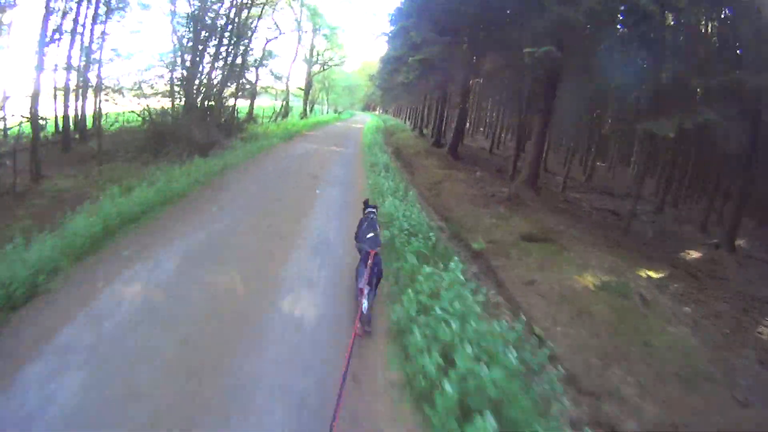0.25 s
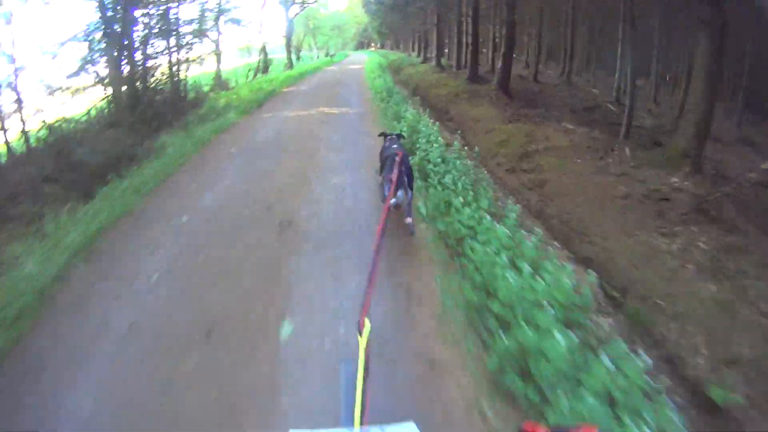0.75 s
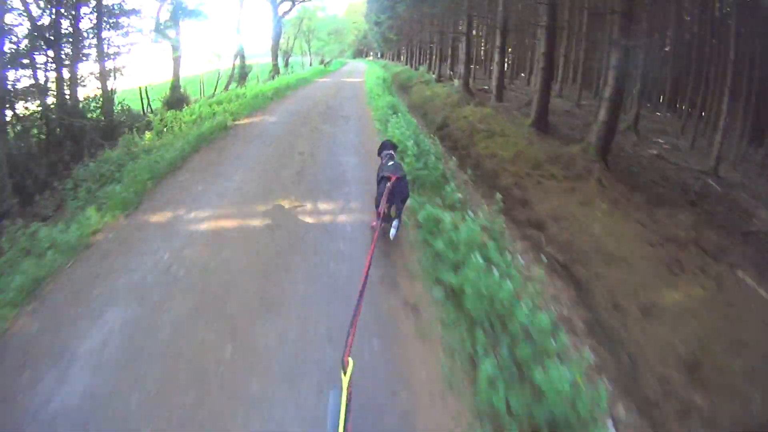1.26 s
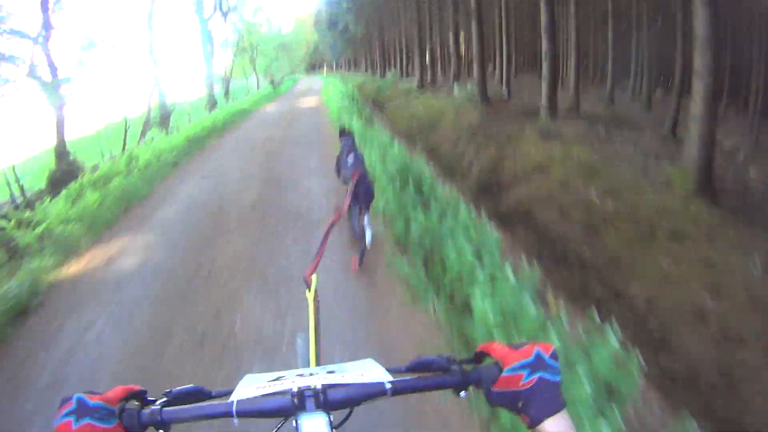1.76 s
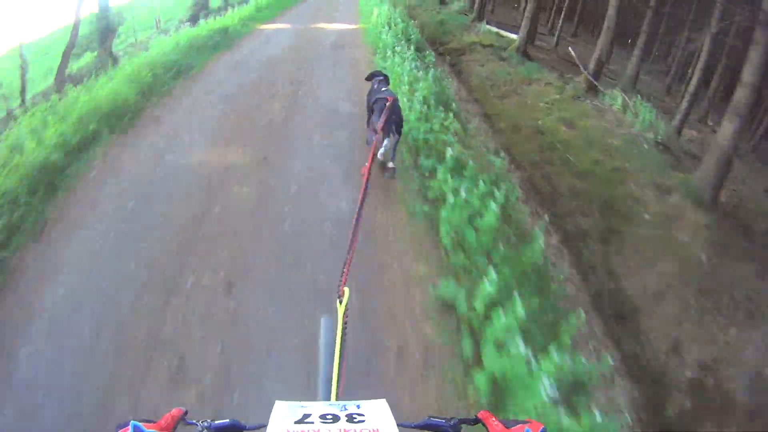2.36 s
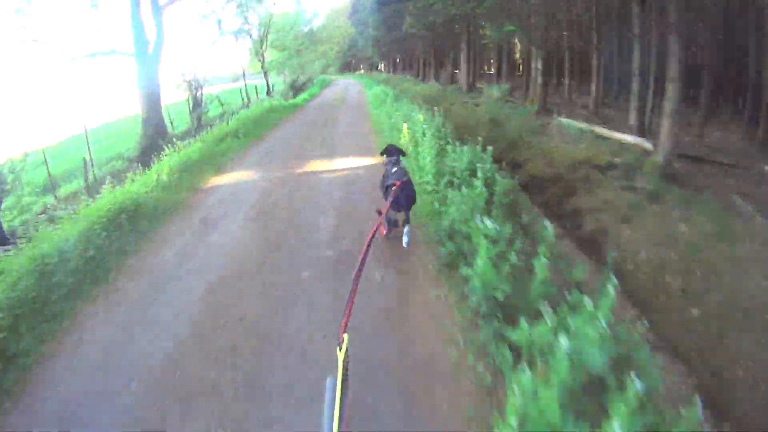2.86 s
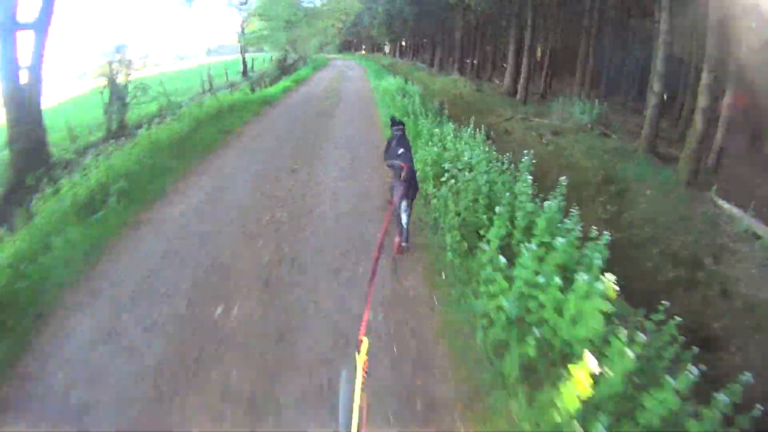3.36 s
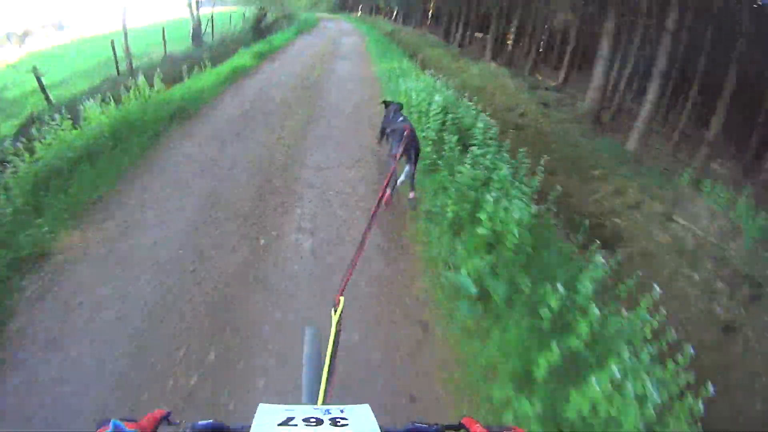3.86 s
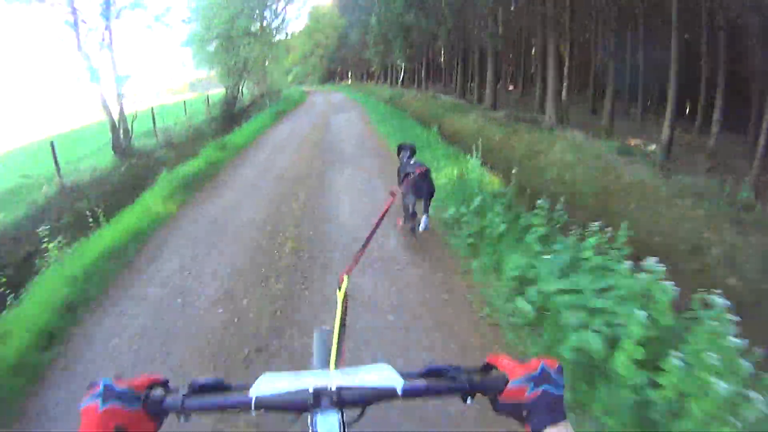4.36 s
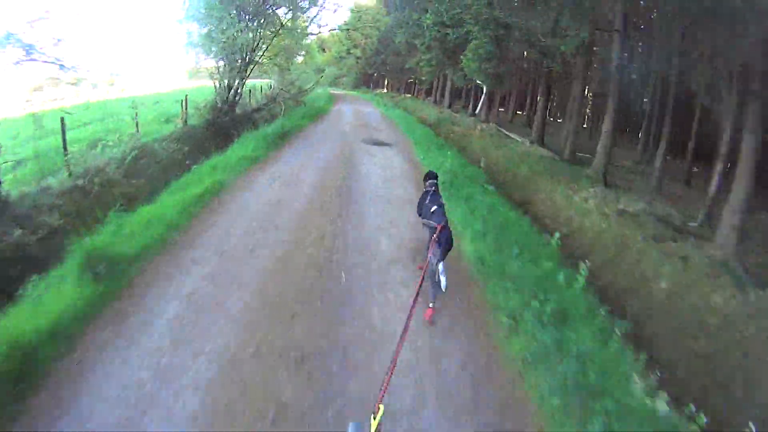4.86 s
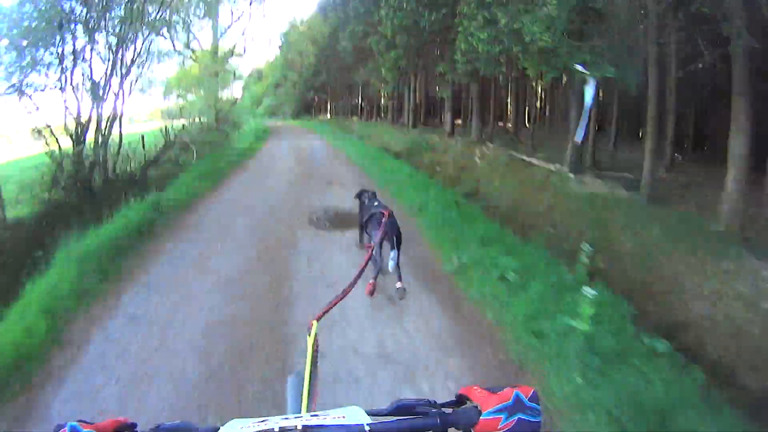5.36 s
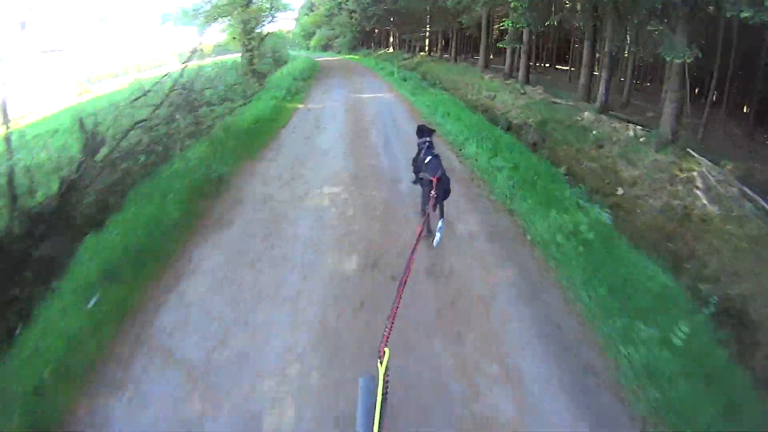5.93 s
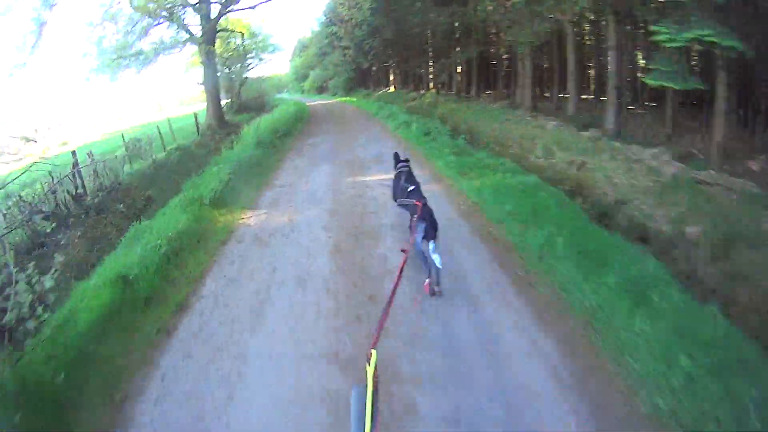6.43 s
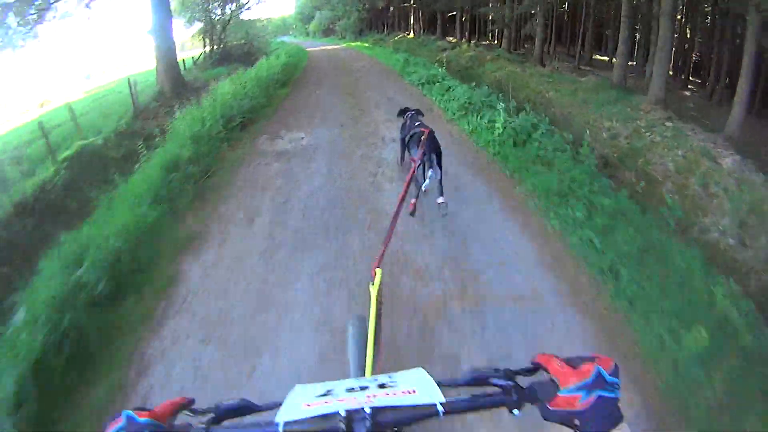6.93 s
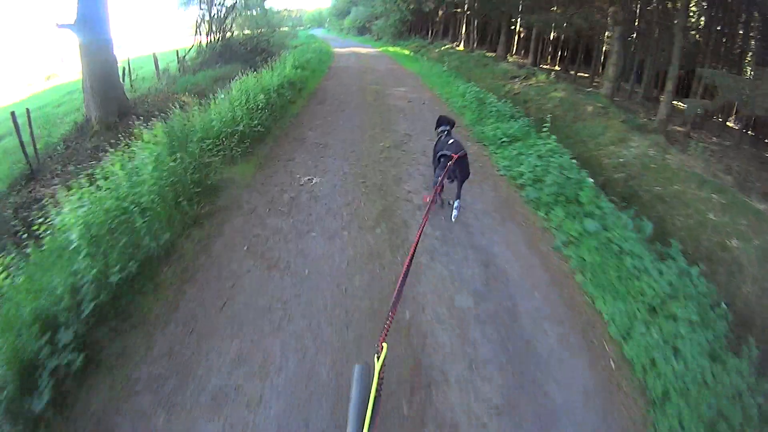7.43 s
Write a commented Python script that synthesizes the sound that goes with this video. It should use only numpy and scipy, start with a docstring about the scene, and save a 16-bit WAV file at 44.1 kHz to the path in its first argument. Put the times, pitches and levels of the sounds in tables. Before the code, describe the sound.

A fast scooter rolls on loose stones, its continuous gritty crunch broken by regular rattling thuds and short scuffs from kicking.

```python
"""Gravel crunches under a fast kick scooter, heard from a small camera in a closed case strapped to the rider.
Random clicks for the stones ring the hollow resonances of the case; the foot's scuffs are gated bursts of such clicks.
Around each kick the case thumps (damped swings), clacks on its mount (noise ringing its shell) and sways
(low noise through chest resonances), and the frame rumbles. Two faint wavering calls lie far off, under mild hiss."""
import sys
import numpy as np
from scipy import signal
from scipy.io import wavfile

SR = 44100
rng = np.random.default_rng(int(sys.argv[2]) if len(sys.argv) > 2 else 0)


def inscribe(sig):
    """Save sig as 16-bit PCM at rate SR to the path in sys.argv[1].

    A 1-D sig is mono; a 2-D sig holds one channel per row.
    Samples are clipped to [-1, 1] before scaling.
    """
    pcm = np.round(np.clip(np.atleast_2d(sig).T, -1, 1) * 32767)
    wavfile.write(sys.argv[1], SR, pcm.astype(np.int16))


N = 339129

# Air resonances in the case. Each row: pitch in Hz, width in Hz, relative gain in dB of the part
# alike in both microphones, relative gain in dB of the opposed part.
CASE_MODES = [(612, 150, -17.5, -25), (821, 60, -6.5, -10), (1293, 258, -1, -5.5), (1452, 185, 4.5, -17.5),
              (1704, 153, 4.5, -10), (2030, 270, -25, -12.5), (2490, 130, -16, -9.5),
              (3090, 800, -18, -17.5), (4060, 1700, -52, -25), (4833, 320, -21.5, -25.5),
              (5415, 220, -22, -36.5), (7840, 1200, -40.5, -53)]


def from_db(db):
    """Gain of a level in dB."""
    return 10 ** (np.asarray(db) / 20)


def rms_one(x):
    """Scaled to rms 1."""
    return x / np.sqrt(np.mean(x ** 2) + 1e-20)


def peak_one(x):
    """Scaled so that the mean of the channels peaks at 1."""
    return x / np.abs(x.mean(axis=0)).max()


def in_time(rows):
    """Each column of a curve, interpolated to every sample."""
    s, *columns = np.transpose(rows)
    return [np.interp(np.arange(N) / SR, s, c) for c in columns]


def drift(rate_hz):
    """Slow random curve of spread near 1: straight lines between 2 * rate_hz random knots per second."""
    knots = rng.standard_normal(int(N / SR * rate_hz * 2) + 2)
    curve = np.interp(np.arange(N), np.linspace(0, N, len(knots)), knots)
    return curve * np.sqrt(1.5)     # interpolation narrows the spread


def band(x, low_hz, high_hz):
    """Butterworth band-pass."""
    return signal.sosfilt(signal.butter(2, [low_hz, high_hz], "band", fs=SR, output="sos"), x)


def resonate(mid_side, modes):
    """Parallel resonances with alternating signs; the alike and opposed parts give left and right."""
    out = np.zeros_like(mid_side)
    for k, (hz, width_hz, mid_db, side_db) in enumerate(modes):
        radius = np.exp(-np.pi * width_hz / SR)
        b = (1 - radius ** 2) / 2 * np.array([1, 0, -1])
        a = [1, -2 * radius * np.cos(2 * np.pi * hz / SR), radius ** 2]
        ringing = signal.lfilter(b, a, mid_side + 1e-18)
        out += (-1) ** k * from_db([[mid_db], [side_db]]) * ringing
    mid, side = out
    return np.array([mid + side, mid - side])


def grains(per_s, spread_db):
    """Random clicks of uneven size, two unrelated streams; rms 1."""
    sizes = from_db(spread_db * np.minimum(rng.exponential(1, (2, N)), 5))
    signs = rng.choice([-1, 1], (2, N))
    return rms_one(sizes * signs * (rng.random((2, N)) < per_s / SR))


def panned(x, pan_db):
    """Left and right of a sound, left louder by pan_db."""
    return x * from_db(np.clip(pan_db, -9, 9) * np.array([[.5], [-.5]]))


def add(out, s, x):
    """Mixes x in at s seconds."""
    i = max(round(s * SR), 0)
    out[:, i:i + x.shape[1]] += x[:, :N - i]


def muffled(x):
    """The wall of the case as a low-pass."""
    wall_hz = 8260
    return signal.sosfilt(signal.butter(4, wall_hz, fs=SR, output="sos"), x)


def swell(half_width_s):
    """Power that rises and falls around each push of the foot; half_width_s reaches 1/e."""
    # Each row: time in seconds, force in dB.
    kicks = [(.94, -0.5), (1.8, 4), (2.66, 1), (3.58, 2.5), (4.46, 0.5), (5.33, 1), (6.18, 0), (7.08, 1.5)]
    t = np.arange(N) / SR
    return sum(from_db(2 * force_db) * np.exp(-((t - s) / half_width_s) ** 2) for s, force_db in kicks)


def loaded(rest_db, kick_db, half_width_s):
    """Level in dB of the part between kicks plus the power that kicks add."""
    power = from_db(2 * rest_db) + from_db(2 * kick_db) * swell(half_width_s)
    return 10 * np.log10(power)


def shaking(level_db, modes, lumpy_db, soft_hz):
    """Random bumps shake a body at its modes; soft contact weakens them above soft_hz."""
    bumps = rng.standard_normal((2, N)) * from_db(lumpy_db * drift(20))
    return from_db(level_db) * rms_one(resonate(band(bumps, 7.4, soft_hz), modes))


def call():
    """A faint far call, perhaps a bird: a wavering sine that sags in pitch, fading in and out."""
    # Each row: start in seconds, length in seconds, initial pitch in Hz before waver, level in dB before flutter.
    far_calls = [(2.08, 0.21, 1030, -47), (3.927, 0.24, 1028, -45)]
    edge_s, sag_hz_per_s, flutter_db = 0.028, 58, 3
    t, out, waver = np.arange(N) / SR, 0, 1 + 0.0074 * drift(40)
    for s, length_s, hz, level_db in far_calls:
        envelope = np.clip(np.minimum(t - s, s + length_s - t) / edge_s, 0, 1) ** 2
        pitch_hz = (hz - sag_hz_per_s * np.clip(t - s, 0, length_s)) * waver
        tone = np.sqrt(2) * np.sin(2 * np.pi * np.cumsum(pitch_hz) / SR)
        out = out + from_db(level_db + flutter_db * drift(15)) * envelope * tone
    return out


def sway():
    """Level of the body's sway in dB: a low wandering rest, and a steep rise and fall at each lurch."""
    # Lurches against the harness. Each row: time in seconds, peak level in dB.
    lurches = [(.64, -47), (.77, -35), (.83, -26.5), (.92, -20.5), (.96, -22.5), (1.07, -32), (1.68, -31),
               (1.77, -22), (1.82, -30), (1.93, -34), (2.23, -39), (2.55, -26.5), (2.65, -25), (2.69, -26),
               (2.87, -45), (3.23, -35), (3.36, -30.5), (3.49, -25), (3.55, -29), (3.6, -18), (4.32, -26),
               (4.45, -20), (4.56, -36), (5.18, -34), (5.28, -25), (5.35, -20), (5.41, -28), (6.0, -31),
               (6.12, -27), (6.21, -23), (6.27, -22.5), (6.36, -37), (6.9, -38), (6.985, -27), (7.07, -18),
               (7.14, -29), (7.32, -41), (7.6, -38)]
    rest_db, wander_db, rise_db_per_s, fall_db_per_s = -61, 5, 500, 400
    t = np.arange(N) / SR
    level_db = rest_db + wander_db * drift(7.4)
    for s, peak_db in lurches:
        drop_db = np.maximum(rise_db_per_s * (s - t), fall_db_per_s * (t - s))
        level_db = np.maximum(level_db, peak_db - drop_db)
    return level_db


def chest():
    """Chest and harness resonate at low pitches as the body sways."""
    # Each row: pitch in Hz, width in Hz, relative gain in dB alike, relative gain in dB opposed.
    chest_modes = [(31, 20, 3, -8), (76.3, 24, 4.5, -4), (104.5, 44, 0.5, -3.5)]
    return shaking(sway(), chest_modes, lumpy_db=1.5, soft_hz=134)


def frame():
    """Frame and strap resonate with the rolling, more strongly around kicks."""
    # Each row: pitch in Hz, width in Hz, relative gain in dB alike, relative gain in dB opposed.
    frame_modes = [(28, 35, -3.5, -30), (111.6, 76, -1, -37), (183, 61, -1, -17.5), (296, 46, 0.5, -9),
                   (457, 206, -11, -6.5), (626, 410, -10, -10.5)]
    level_db = loaded(rest_db=-44, kick_db=-36.5, half_width_s=0.11)
    return shaking(level_db, frame_modes, lumpy_db=2.5, soft_hz=970)


def thumps():
    """A blow through the strap is a damped swing with an overtone, its phase unlike in the two microphones."""
    # Each row: time in seconds, relative level in dB, pitch in Hz.
    blows = [(.76, -24, 313), (0.8724, -30.5, 263), (.9092, -16, 252), (0.919, -5, 480), (0.9295, -13, 304),
             (0.9498, -21, 478), (0.9604, -10.5, 242), (.9683, -20, 295), (1.0526, -20, 290),
             (1.083, -27, 440), (1.0872, -25, 630), (1.6654, -27.5, 202), (1.69, -32, 513),
             (1.7253, -24.5, 276), (1.7403, -4, 520), (1.7607, -15, 231), (1.768, -19, 238),
             (1.779, -20, 406), (1.7974, -24, 585), (1.826, -14, 226), (1.8336, -26, 314),
             (1.8539, -18, 536), (1.9036, -22, 258), (1.938, -20, 450), (1.9448, -21.5, 530),
             (2.554, -28.5, 184), (2.5938, -11, 594), (2.6115, -29, 181), (2.6338, -21.5, 320),
             (2.6454, -7.5, 227), (2.7054, -16.5, 318), (2.714, -28, 353), (2.82, -25, 715),
             (2.823, -31.5, 433), (3.2038, -13, 625), (3.3597, -11.5, 333), (3.4883, -11.5, 583),
             (3.514, -24, 276), (3.5473, -10, 557), (3.5758, -11, 252), (3.585, -18.5, 147),
             (3.596, -16, 455), (3.6189, -15, 263), (3.7013, -27.5, 286), (3.737, -25.5, 430),
             (3.743, -19.5, 800), (4.301, -19, 316), (4.3963, -0.5, 527), (4.4203, -14.5, 292),
             (4.4301, -12, 563), (4.4377, -0.5, 633), (4.445, -24, 161), (4.4602, -18, 606),
             (4.4803, -23, 348), (4.4855, -13.5, 282), (4.494, -19, 324), (4.512, -23, 637),
             (4.5537, -26.5, 283), (4.608, -24.5, 740), (5.164, -29, 253), (5.255, -31, 500),
             (5.26, -24.5, 484), (5.2869, -22, 310), (5.3161, -5, 393), (5.3241, -23, 298),
             (5.337, -27, 305), (5.3479, -1.5, 640), (5.354, -16, 375), (5.3632, -21, 522),
             (5.3966, -7, 327), (5.4775, -20, 252), (5.603, -30.5, 304), (6.1101, -27, 223),
             (6.1257, -32, 190), (6.1704, -22.5, 281), (6.2121, -20, 415), (6.2148, -13.5, 290),
             (6.219, -8, 594), (6.242, -19, 536), (6.2695, -9, 218), (6.2927, -28, 309), (6.3483, -24, 257),
             (7.0176, -29, 264), (7.0584, -17.5, 315), (7.0678, -14, 330), (7.12, -7.5, 272),
             (7.1929, -21.5, 270), (7.226, -27, 500), (7.2334, -23, 440), (7.289, -30.5, 282),
             (7.316, -31, 293)]
    # Soft blows ring for more cycles, as do those near the strap's own pitch.
    hard_cycles, cycles_per_db, pan_spread_db = 1.45, .35, 1.5
    strap_hz, strap_width_hz, strap_cycles = 310, 47, 2.5
    out, t = np.zeros((2, N)), np.arange(4500) / SR
    for s, level_db, hz in blows:
        cycles = hard_cycles - cycles_per_db * level_db
        cycles += strap_cycles * np.exp(-((hz - strap_hz) / strap_width_hz) ** 2)
        t60_s = max(cycles / hz, .005)
        pan_db = pan_spread_db * rng.standard_normal()
        phase = rng.choice([0, np.pi]) + rng.normal(1.34, 0.4) * np.array([[.5], [-.5]])
        envelope = from_db(-60 * t / t60_s) * (1 - np.exp(-t / 0.0002))
        # Overtone and clatter get the envelope twice, so they die sooner.
        overtone = 0.41 * np.sin(2 * np.pi * 2.29 * hz * t + 3 * phase) * envelope
        buckles = .5 * envelope * rms_one(band(rng.standard_normal((2, len(t))), 596, 1190))
        swing = np.sin(2 * np.pi * hz * t + phase) + overtone + buckles
        add(out, s, panned(swing * envelope, pan_db) * from_db(level_db + 6.0))
    return out


def ticks():
    """Small clacks at random moments, uneven in level, treble and length; rows as in clacks()."""
    per_s, level_db, treble_db, length_ms = 4, -26.5, -25.5, 2.4
    when, loud, bright, long = rng.random((int(per_s * N / SR), 4)).T
    return np.transpose([when * N / SR, level_db + 6 * (loud - .5),
                         treble_db + 8 * (bright - .5), length_ms * (.5 + long)])


def clacks():
    """The case hits its mount: dying chatter rings the shell; its first instant carries the overtones."""
    # Each row: time in seconds, relative level in dB, relative treble in dB, nominal length in ms.
    hits = [(.0922, -22.5, -36, 2.5), (.9078, -18, -16, 7.7), (.9162, -22, -16, 9.8), (.9261, -7, -22, 3),
            (.9506, -17, -37, 8.6), (.962, -20, -29, 5.3), (1.0518, -21, -26, 5.2), (1.0826, -16, -33, 3.1),
            (1.0907, -18, -37, 2.8), (1.658, -14, -38, 12), (1.6663, -18, -31, 5.8), (1.74, -14, -31, 3.6),
            (1.7439, -9, -16, 3.3), (1.7634, -14, -21, 7.1), (1.7797, -9.5, -26, 2.4),
            (1.7973, -14.5, -34, 3.3), (1.8158, -17.5, -37, 9.1), (1.8226, -25, -33, 3.5),
            (1.916, -15.5, -34, 3.6), (1.9408, -15, -39, 2.2), (2.1288, -22.5, -33, 6.1),
            (2.2161, -20, -32, 3.1), (2.361, -20, -37, 4.5), (2.5162, -7.5, -47, 7.6),
            (2.5931, -7.5, -16.5, 7), (2.63, -17, -35, 12), (2.6389, -14, -38, 4.7),
            (2.7023, -6.5, -25, 4.3), (2.7675, -22, -23, 4.4), (3.201, -9, -23.5, 9.5),
            (3.2061, -14, -33, 2.9), (3.303, -19, -26, 11), (3.3196, -17.5, -17.5, 8.7),
            (3.357, -23, -33, 21), (3.3854, -15, -17, 2.2), (3.459, -23, -33, 6.8), (3.546, -11, -25, 1.8),
            (3.55, -7, -17, 4.6), (3.557, -18, -27, 20), (3.5763, -13.5, -28, 2.8), (3.5923, -13, -32, 4.9),
            (3.6182, -25, -29, 3.5), (3.6251, -20.5, -28, 7.7), (3.6312, -24, -21, 13),
            (3.6974, -18, -33, 7), (3.7374, -18, -38, 5), (4.3104, -15.5, -36, 10), (4.3957, -10, -32, 2.2),
            (4.4006, -8, -18.5, 4.1), (4.4205, -12, -34, 6.6), (4.4378, -4.5, -44, 3.4),
            (4.459, -12, -31, 3.4), (4.485, -19, -21, 2.7), (4.4887, -9.5, -27, 5.5),
            (4.6228, -22, -27, 2.4), (4.7247, -20.5, -26, 6.3), (4.756, -25, -29, 4.5),
            (5.2326, -17.5, -33, 5), (5.3155, -31, -20, 2.5), (5.3202, -10.5, -15.5, 5.3),
            (5.3354, -15, -22, 5.4), (5.3516, -6, -25, 3.4), (5.362, -23, -31, 2.1),
            (5.3965, -17.5, -27, 18), (5.4093, -17, -17, 8.2), (5.4735, -14, -42, 8.1),
            (5.7603, -23, -28, 2.7), (5.8518, -18.5, -31, 4.1), (6.0644, -13, -25, 4.6),
            (6.0736, -19.5, -21, 4), (6.1047, -20, -28, 6.7), (6.155, -32, -12, 4), (6.21, -19, -26, 4.4),
            (6.2405, -19, -32, 3.8), (6.2665, -17, -32, 11), (6.2778, -21, -27, 4.4),
            (6.929, -14.5, -20, 3), (6.9359, -21.5, 6.5, 4.9), (6.9542, -17.5, -26, 9.7),
            (6.961, -26, -23, 4.6), (7.0597, -18.5, -34, 5.3), (7.1173, -18, -35, 7.6),
            (7.1898, -20, -25, 6.6), (7.228, -21, -30, 7.5)]
    # Plastic shell, then its bright overtones. Each row: pitch in Hz, width in Hz,
    # relative gain in dB alike, relative gain in dB opposed.
    shell_modes = [(796, 187, -9.5, -13), (1383, 210, 0, -14.5), (1740, 330, -0.5, -14),
                   (2724, 400, -10, -12.5), (3084, 510, -12.5, -14)]
    overtone_modes = [(4950, 204, 7.5, 5), (7280, 780, -5, -6), (9300, 1200, -12, -13)]
    out, t = np.zeros((2, N)), np.arange(1400) / SR
    for s, level_db, treble_db, length_ms in [*hits, *ticks()]:
        length_ms = max(length_ms, .5)
        chatter = rng.standard_normal((2, len(t))) * np.exp(-t / (length_ms / 1600))
        chatter *= 1 - np.exp(-t / (length_ms / 16000))     # long ones swell in
        low = peak_one(band(resonate(chatter, shell_modes), 320, 3400))
        first_instant = chatter * np.exp(-t / 0.002)
        top = peak_one(band(resonate(first_instant, overtone_modes), 3200, 9600))
        add(out, s, from_db(level_db + 1.0) * (low + from_db(treble_db + 3.0) * top))
    return out


def scuffs():
    """The sole ploughs loose stones, catching and slipping; fine grit hisses on top."""
    # Each row: start in seconds, length in seconds, relative level in dB, slips per second,
    # slip depth from 0 to 1, grit against body in dB.
    drags = [(0.803, 0.0087, -15, 72, 0.6, -20), (2.524, 0.019, -13, 170, 0.64, -15),
             (3.382, 0.027, -18, 83, 0.4, 4), (3.464, 0.0096, -31, 56, 0.4, -15),
             (3.623, 0.023, -21, 140, .4, 4), (5.157, 0.06, -21, 170, 0.32, 7),
             (6, 0.0503, -19, 190, 0.3, 8.5), (6.258, 0.02, -14.5, 100, 0.07, 4),
             (6.882, 0.048, -18.5, 136, 0.64, 8.5)]
    body, grit = np.zeros(N), np.zeros(N)
    t = np.arange(N) / SR
    for s, length_s, level_db, slips_per_s, depth, treble_db in drags:
        slipping = 1 - np.clip(depth, 0, 1) * ((t - s) * slips_per_s % 1)     # each starts sharply and fades
        edges = np.clip(np.minimum(t - s, s + length_s - t) / 0.0014 + .5, 0, 1)
        envelope = from_db(level_db) * slipping * edges
        body += envelope
        grit += envelope * from_db(treble_db)
    stones = grains(per_s=6100, spread_db=0.5) * from_db(1.1 * drift(90))
    ploughed = body * band(stones, 1370, 3540) + grit * band(stones, 5860, 12200)
    return from_db(12.5) * resonate(ploughed, CASE_MODES)


def gravel():
    """Stones shift and snap under the tyres in clumps, harder as a kick loads them, and ring the case."""
    # Crunch between kicks. Each row: time in seconds, relative level in dB.
    rolling = [(0, -33), (.75, -30), (1.6, -31.5), (2.3, -32), (3.0, -32.5), (3.3, -29), (3.9, -33),
               (4.2, -30.5), (4.8, -32), (5.2, -27.5), (5.6, -32), (6.04, -27), (6.43, -31.5), (6.7, -29),
               (7.69, -29.5)]
    crunch_db = loaded(in_time(rolling)[0], kick_db=-35, half_width_s=0.18)
    clumps_db = 1.74 * drift(25) + 0.78 * drift(10)
    stones = grains(per_s=5000, spread_db=2.0) * from_db(clumps_db)
    return from_db(crunch_db - 1.42) * rms_one(resonate(stones, CASE_MODES))


def scene():
    """Far call, body, frame, mount, foot and tyres, leaning slightly left."""
    air = muffled(muffled(gravel() + scuffs())) + call()
    everything = air + clacks() + muffled(thumps()) + frame() + chest()
    return panned(everything, 1.0)


def record(dry):
    """Peaks are rounded; microphone hiss, partly shared by the channels; the top is cut."""
    hiss_gain_db, hiss_side_db, cutoff_hz = -58, -5, 11000     # side gain is relative to the shared part
    hiss = band(rng.standard_normal((2, N)), 2400, 12500)
    mid, side = hiss * from_db([[hiss_gain_db], [hiss_gain_db + hiss_side_db]])
    wet = .9 * np.tanh(dry / .9) + np.array([mid + side, mid - side])
    return signal.sosfilt(signal.ellip(10, .3, 50, cutoff_hz, fs=SR, output="sos"), wet)


dry = scene()
out = record(dry)
inscribe(out)
```